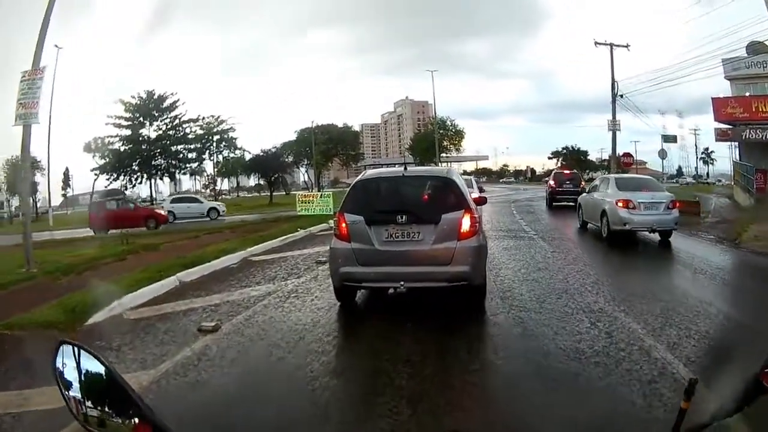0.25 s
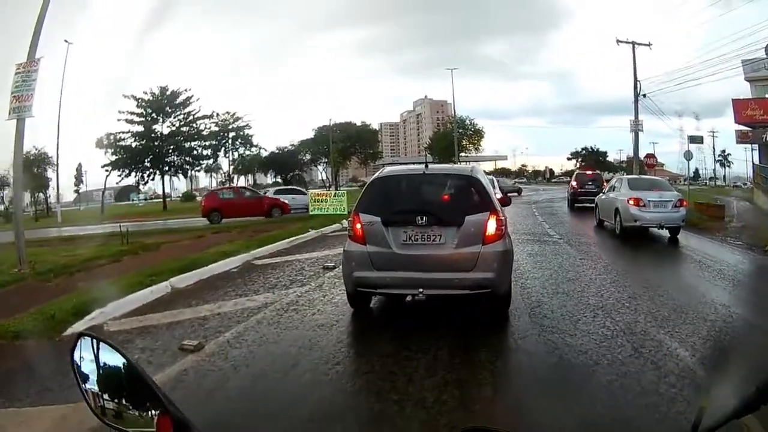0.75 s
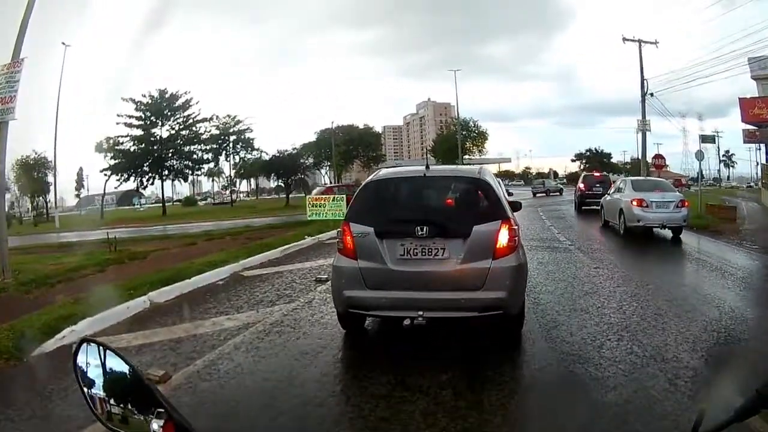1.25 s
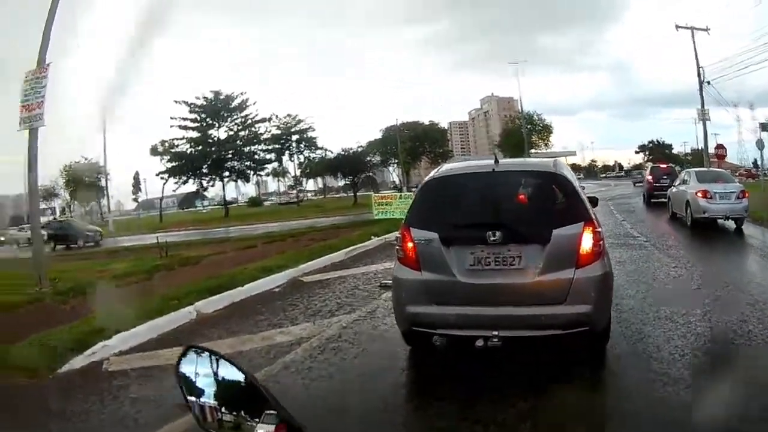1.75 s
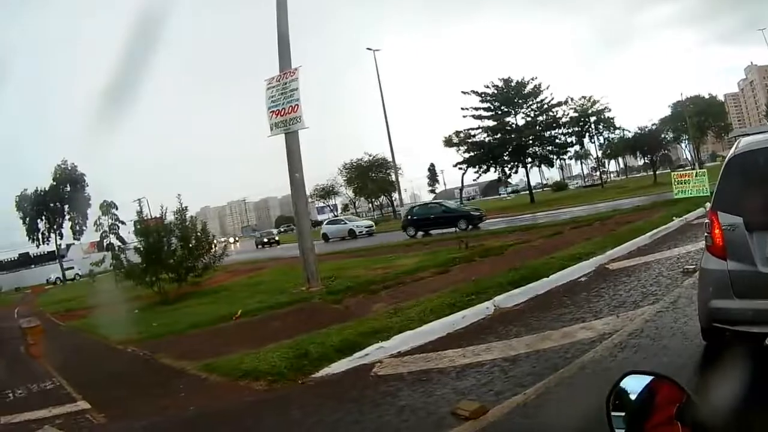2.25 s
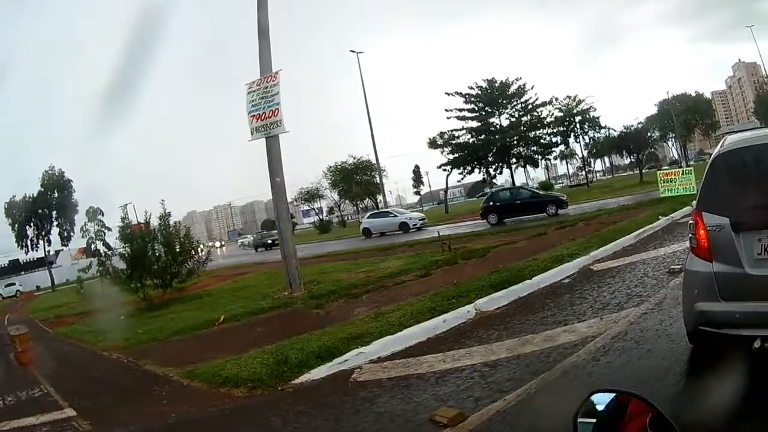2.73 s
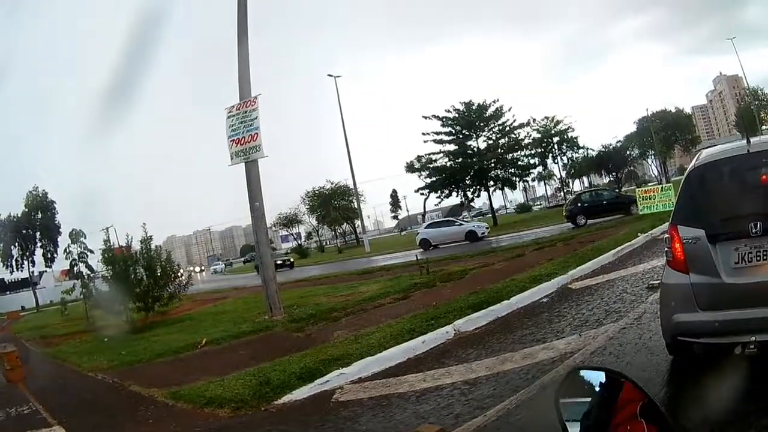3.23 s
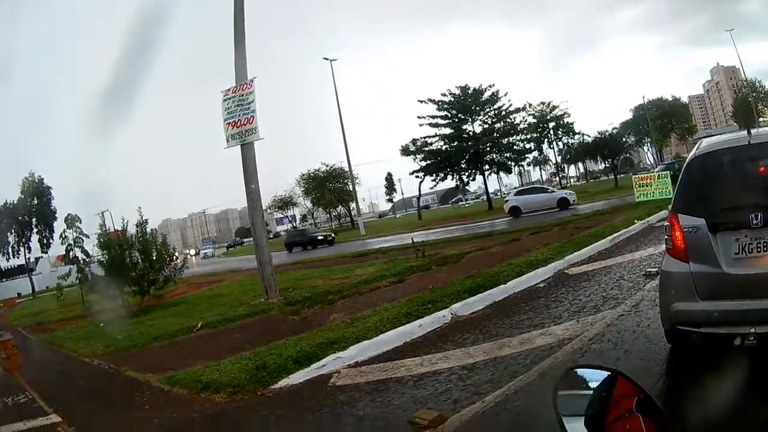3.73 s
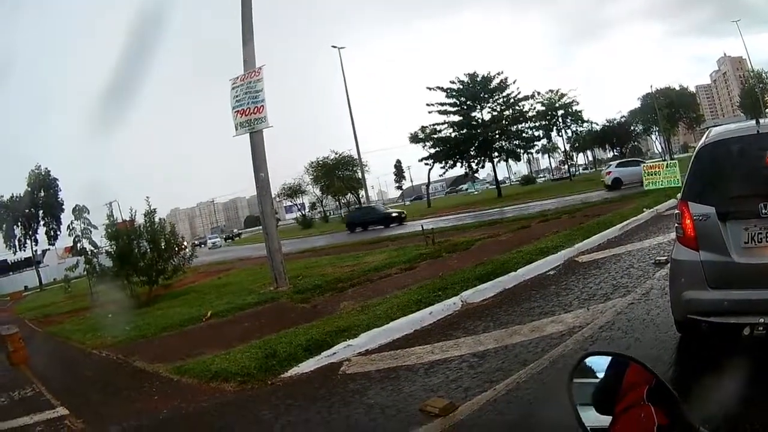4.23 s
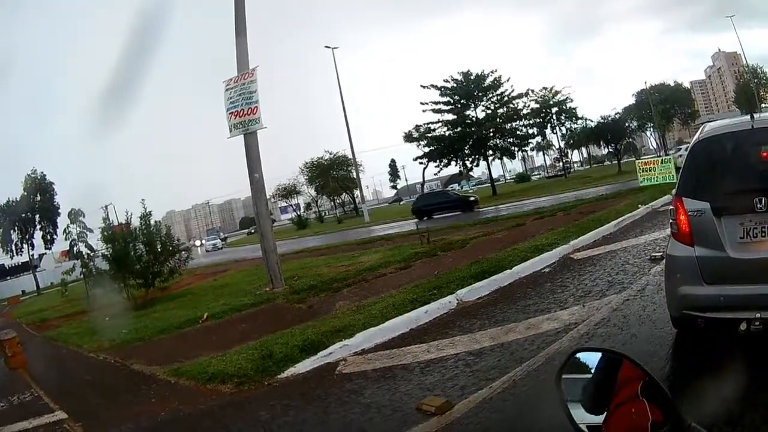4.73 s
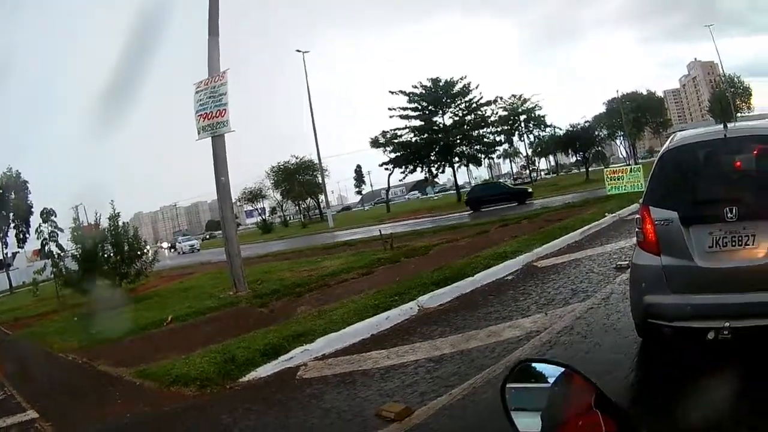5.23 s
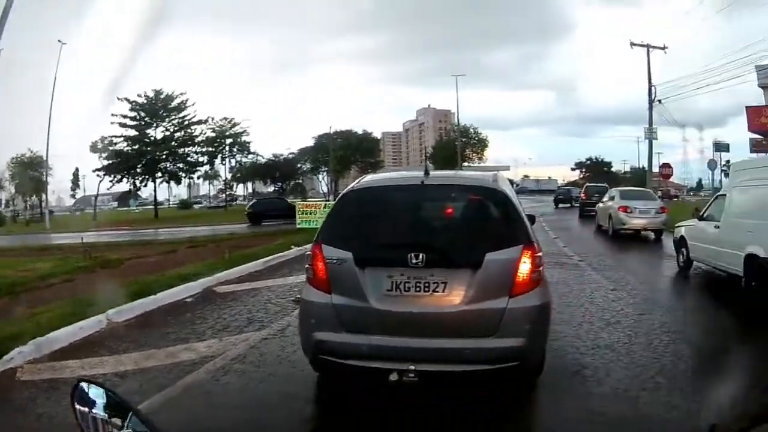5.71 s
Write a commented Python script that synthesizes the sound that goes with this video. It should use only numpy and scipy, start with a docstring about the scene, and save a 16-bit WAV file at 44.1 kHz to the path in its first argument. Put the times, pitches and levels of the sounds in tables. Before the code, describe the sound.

A muffled engine hum and low wind on a wet road, with scattered close raindrop ticks and a single heavy bump.

```python
"""Motorcycle in wet traffic

A motorcycle creeps through a queue on a wet road; the microphone is a camera's, shut in a rain housing.
Engines drone low, wind rumbles on the housing, and wet tyres hiss through its hollow resonances.
Right at the microphone raindrops tick on the shell; once the mount knocks and rubs as the camera swings."""
import sys
import numpy as np
from scipy.fft import rfft, irfft, next_fast_len
from scipy.io import wavfile
from scipy.ndimage import map_coordinates

SR = 44100
rng = np.random.default_rng(int(sys.argv[2]) if len(sys.argv) > 2 else 0)


def wav_record(signal):
    """Record a signal, one row per channel, as 16-bit PCM in the file named by sys.argv[1]."""
    frames = np.transpose(np.atleast_2d(signal))
    bounded = np.clip(frames, -1, 1)
    # unit amplitude maps onto the largest positive 16-bit level
    quanta = np.round(bounded * 32767).astype(np.int16)
    wavfile.write(sys.argv[1], SR, quanta)


N = 263277

# Fine contact noise on the shell. Each row: frequency in Hz, spectrum level in dB.
SCRATCH_SPECTRUM = [(900, -10), (2000, 9), (2900, -8), (4000, 2), (4800, -7), (6500, -24.5)]


def engines():
    """The nearest engine evenly gathers speed; those farther off in the queue swell and sink away."""
    # The nearest drone. Each row: time in seconds, level in dB.
    near_levels = [(0, -40.5), (0.35, -33), (0.75, -30.5), (1.15, -37), (2.25, -40), (2.39, -31),
                   (2.54, -40), (2.68, -32), (2.95, -33.5), (3.15, -42), (4.45, -41), (4.9, -53)]
    # The other engines. Each row: start and end in seconds, firing rate at the start in Hz,
    # its change in Hz per second, level in dB.
    queue = [(0, 0.25, 96, 2, -45), (0.46, 3.29, 99, 5.5, -51.5), (4.8, 5.35, 126.7, 8, -50),
             (4.9, 5.2, 93.5, 0, -45), (4.3, 5.97, 62.8, -0.64, -40)]
    firing_hz, climb_hz_per_s, fade_db_per_s = 59.64, 3.2, 33
    t = clock()
    near_db = np.interp(t, *np.transpose(near_levels))
    out = exhaust(firing_hz + climb_hz_per_s * t, near_db, overtone_db=-31.5, uneven_db=3.0)
    for start, end, hz, hz_per_s, db in queue:
        fade_db = fade_db_per_s * np.abs(t - np.clip(t, start, end))
        out += exhaust(hz + hz_per_s * (t - start), db - fade_db, overtone_db=-26.5, uneven_db=2.7)
    return out


def exhaust(hz, db, overtone_db, uneven_db):
    """A muffled exhaust: the firing tone and two weak overtones, uneven in strength."""
    phase = 2 * np.pi * (np.cumsum(hz) / SR + rng.random())
    overtones = np.sin(2 * phase) + np.sin(3 * phase) / 2
    tone = np.sin(phase) + amp(overtone_db) * overtones
    return np.sqrt(2) * tone * amp(db + uneven_db * wobble(18))


def wind():
    """Wind buffets the housing: it flutters, gusts, and slowly eases."""
    # The rumble. Each row: frequency in Hz, spectrum level in dB.
    buffet_spectrum = [(12, -31), (22, -12), (32, -3), (43, -4), (55, 1), (68, 2.5), (82, -4), (95, -5),
                       (115, -15), (160, -26.5), (260, -52.5)]
    # Each row: time of the gust's peak in seconds, half length in seconds, rise in dB.
    gusts = [(2.05, 0.07, 7), (2.7, 0.06, 2.5), (4.452, 0.035, 5), (5.927, 0.058, 5)]
    start_db, fall_db_per_s, flutter_db = -37, 0.45, 2.0
    gust_db = sum(db * swell(s, half) for s, half, db in gusts)
    level_db = start_db - fall_db_per_s * clock() + gust_db + flutter_db * wobble(12)
    return amp(level_db) * noise(buffet_spectrum)


def rain():
    """Each drop rings the wall, ticks in the high modes its landing spot favours, and briefly splashes."""
    # Drops on the housing. Each row: start in seconds, wall ring in dB, wall pitch ratio,
    # tick level in dB, tick centre in Hz.
    drops = [(0.081, -53, 0.86, -65.5, 4600), (0.1983, -34.5, 0.96, -58, 3700),
             (0.9848, -48.5, 0.92, -53, 4200), (1.2267, -49.5, 0.97, -61, 4500),
             (1.3806, -23.5, 1.01, -53.5, 3560), (1.5428, -50, 0.93, -60, 4600),
             (2.0793, -60, 0.94, -64.5, 4400), (3.2344, -53, 0.9, -77, 3400),
             (4.5090, -52, 0.92, -68, 3500), (5.2714, -48.5, 0.87, -53, 4350)]
    # The housing's wall ring and sharp tick. Each row: frequency in Hz, level in dB, t60 in seconds.
    wall_modes = [(1277, -1.5, .019), (1532, -0.5, 0.024), (2070, -21.5, 0.018), (2550, -26.5, 0.023),
                  (3430, -29.5, 0.011), (5650, -38.5, .012), (6250, -41, 0.014), (6760, -44, .014)]
    tick_modes = [(3260, -5.5, 0.022), (3470, -2, 0.025), (3810, -7.5, .016), (4340, 0, 0.0089),
                  (4590, -4, 0.023), (4880, -10, 0.018)]
    splash_decay_s, splash_db, tick_slope_db_per_hz = 0.0025, -3, 0.009
    t, out = clock(), np.zeros(N)
    splash_noise = noise(SCRATCH_SPECTRUM)
    for s, wall_db, ratio, tick_db, centre_hz in drops:
        wall = [(hz * ratio, db, t60) for hz, db, t60 in wall_modes]
        tick = [(hz, db - tick_slope_db_per_hz * abs(hz - centre_hz), t60) for hz, db, t60 in tick_modes]
        burst = (t >= s) * np.exp(-np.abs(t - s) / splash_decay_s)
        splash = amp(splash_db) * burst * splash_noise
        out += amp(wall_db) * strike(wall, s) + amp(tick_db) * (strike(tick, s) + splash)
    return out


def mount():
    """The mount takes one dull knock, then shudders as the camera swings round."""
    # The mount's answer to a knock. Each row: frequency in Hz, level in dB.
    knock_spectrum = [(25, -37), (60, -14.5), (110, -11.5), (160, -18), (240, -19.5), (290, -16),
                      (345, -20), (405, -11), (455, -10), (560, -33.5), (1000, -53.5), (1280, -50),
                      (2000, -48.5), (2700, -78), (4000, -72.5), (6500, -96)]
    knock_s, knock_db = 1.9902, -10.5
    shudder_delay_s, shudder_hz, shudder_db = 0.12, 63, -21.5
    out = sway(knock_s, db=-14.5, start_hz=161.6, end_hz=48.2, settle_s=0.011, rise_s=0.018)
    out -= amp(knock_db) * thump(knock_spectrum, knock_s)
    shudder = np.sin(2 * np.pi * shudder_hz * (clock() - knock_s))
    return out + amp(shudder_db) * swell(knock_s + shudder_delay_s, half_s=0.047) * shudder


def sway(s, db, start_hz, end_hz, settle_s, rise_s):
    """Knocked at time s, the mount swings a few times, sinking in pitch as it settles."""
    t = np.maximum(clock() - s, 0)
    cycles = end_hz * t + (start_hz - end_hz) * settle_s * (1 - np.exp(-t / settle_s))
    envelope = (t / rise_s * np.exp(1 - t / rise_s)) ** 2
    return amp(db) * envelope * np.sin(2 * np.pi * cycles)


def soft_contacts():
    """First a raindrop's dull, low knock on the housing; later, short grainy rubs of the mount."""
    # Each row: peak time in seconds, half length in seconds, dull part in dB, grainy part in dB.
    # The first row is the raindrop.
    contacts = [(1.549, 0.012, -45.5, -79), (1.883, 0.01, -49.5, -83.5), (2.048, .012, -50, -66),
                (2.084, 0.018, -50, -74), (2.13, 0.015, -50, -76), (5.419, 0.016, -45.5, -77),
                (5.46, .035, -63, -76)]
    # The dull part. Each row: frequency in Hz, spectrum level in dB.
    dull_spectrum = [(120, -16), (250, -6.5), (430, 12), (560, -5), (750, -4), (1100, -26)]
    dull = noise(dull_spectrum)
    grain = unit(noise(SCRATCH_SPECTRUM) * amp(3 * wobble(300)))
    return sum(swell(s, half) * (amp(dull_db) * dull + amp(grain_db) * grain)
               for s, half, dull_db, grain_db in contacts)


def traffic():
    """Road rumble and tyre spray slowly draw closer, heard through the resonances of the housing."""
    # Both as they sound inside the housing. Each row: frequency in Hz, spectrum level in dB.
    road_spectrum = [(70, -21), (140, 2.5), (200, -1), (290, -0.5), (350, -5.5), (400, -0.5), (440, 3.5),
                     (475, -5), (530, -13.5), (700, -22.5), (1100, -42.5)]
    spray_spectrum = [(300, -24.5), (600, -11), (820, -7.5), (1000, -9.5), (1130, -5.5), (1260, 3.5),
                      (1450, -14), (1650, -6), (1950, -16.5), (2400, -17), (2900, -23.5), (3350, -21.5),
                      (4500, -29), (7500, -42)]
    road_db, spray_db, rise_db_per_s = -54, -61.6, 0.12
    nearness_db = rise_db_per_s * clock()
    road = amp(road_db + nearness_db + 0.9 * wobble(13)) * noise(road_spectrum)
    spray = amp(spray_db + nearness_db + 0.46 * wobble(14)) * noise(spray_spectrum)
    return road + spray


def strike(modes, s):
    """Damped modes struck at time s; neighbours swing in opposite senses, so the ring swells and beats."""
    t, ring = np.arange(SR // 8) / SR, 0
    for k, (hz, db, t60) in enumerate(modes):
        decay = np.exp(-np.log(1000) * t / t60)
        ring += (-1) ** k * amp(db) * decay * np.sin(2 * np.pi * hz * t)
    return np.pad(ring, (round(s * SR), N))[:N]


def thump(spectrum, s, size=16384):
    """The answer, of peak 1, of a damped body with this spectrum to a blow at time s."""
    hz, db = np.transpose(spectrum)
    bin_hz = np.fft.rfftfreq(size, 1 / SR)
    gain = amp(np.interp(np.log(bin_hz + 1), np.log(hz), db))
    cepstrum = irfft(np.log(gain))[:size // 2]
    cepstrum[1:] *= 2  # minimum phase: nothing sounds before the blow
    answer = irfft(np.exp(rfft(cepstrum, size)))
    return np.pad(answer / np.abs(answer).max(), (round(s * SR), N))[:N]


def noise(spectrum):
    """Noise of rms 1 with a (Hz, dB) spectrum that falls away beyond its ends."""
    hz, db = np.transpose(spectrum)
    log_hz = np.log(np.r_[hz[0] / 2, hz, hz[-1] * 2])
    db = np.r_[db[0] - 20, db, db[-1] - 20]
    white = rng.standard_normal(N)
    return unit(filtered(white, lambda f: amp(np.interp(np.log(f + 1), log_hz, db, -np.inf, -np.inf))))


def filtered(x, response):
    """x through a filter whose gain is response(Hz)."""
    size = next_fast_len(N + SR // 2)
    gain = response(np.fft.rfftfreq(size, 1 / SR))
    return irfft(rfft(x, size) * gain, size)[:N]


def swell(s, half_s):
    """A bell-shaped rise to 1 at time s and a fall."""
    return np.exp(-.5 * ((clock() - s) / half_s) ** 2)


def wobble(rate):
    """A smooth random curve, rate knots a second."""
    knots = rng.standard_normal(int(N * rate / SR) + 4)
    return map_coordinates(knots, [clock() * rate])


def amp(db):
    """Decibels to gain."""
    return 10 ** (np.asarray(db) / 20)


def unit(x):
    """x at rms 1."""
    return x / np.sqrt(np.mean(x ** 2) + 1e-20)


def clock():
    """The time of every sample in seconds."""
    return np.arange(N) / SR


def scene():
    """Everything that reaches the one microphone inside the housing."""
    return (engines() + wind() + traffic() + rain() + mount() + soft_contacts())[None]


def record(dry):
    """The camera adds its own hiss and keeps nothing above its band limit."""
    # Microphone self-noise. Each row: frequency in Hz, spectrum level in dB.
    hiss_spectrum = [(2000, -1), (6000, -0.5), (8000, -1.5), (12000, -1), (15400, 2)]
    hiss_db, top_hz = -80, 15550
    hiss = amp(hiss_db) * noise(hiss_spectrum)
    return filtered(dry[0] + hiss, lambda hz: hz < top_hz)[None]


dry = scene()
out = record(dry)
wav_record(out)
```